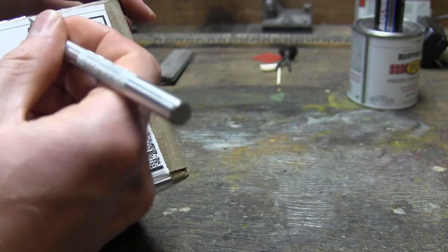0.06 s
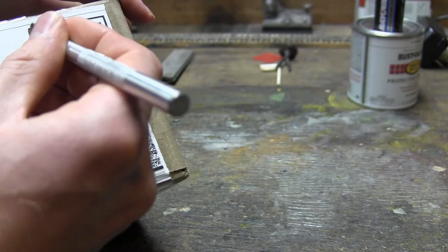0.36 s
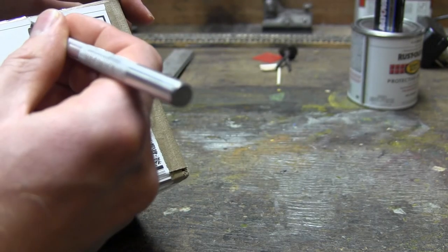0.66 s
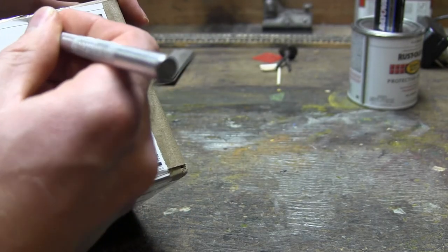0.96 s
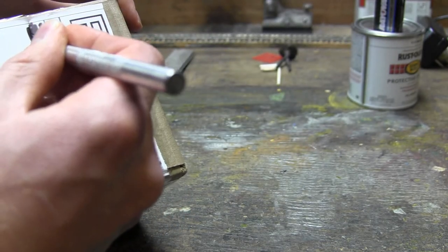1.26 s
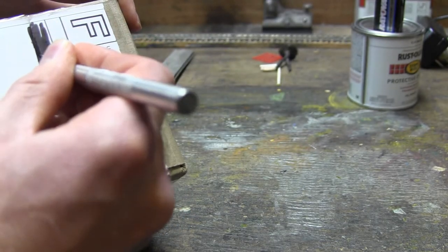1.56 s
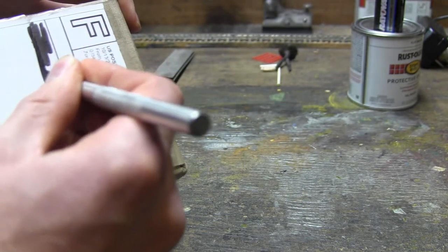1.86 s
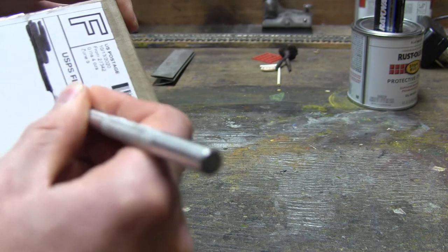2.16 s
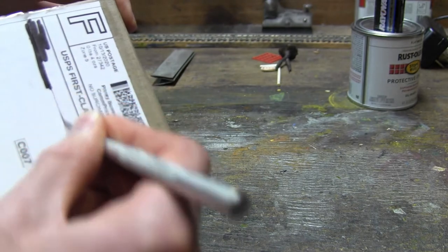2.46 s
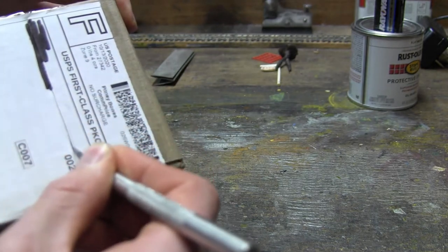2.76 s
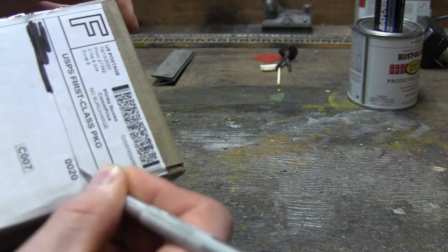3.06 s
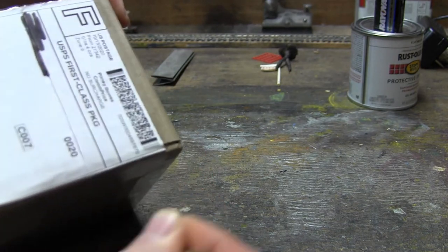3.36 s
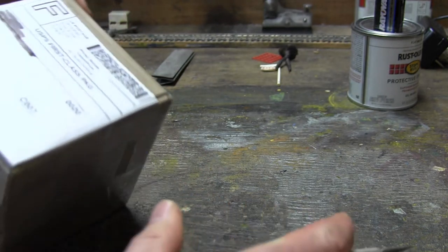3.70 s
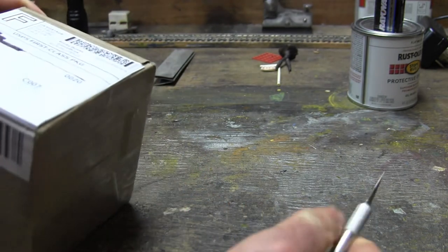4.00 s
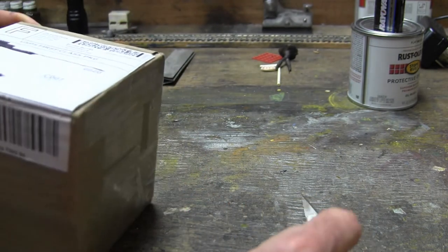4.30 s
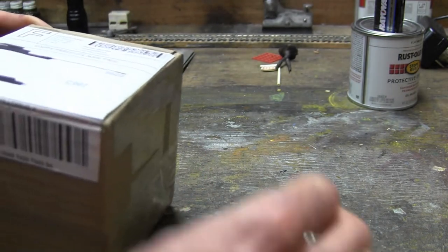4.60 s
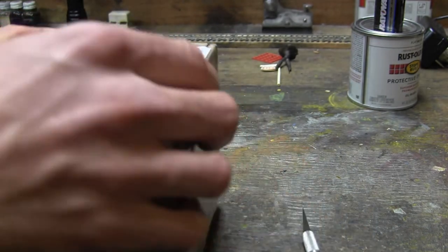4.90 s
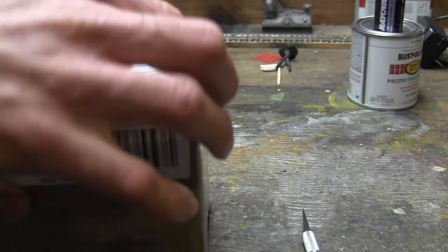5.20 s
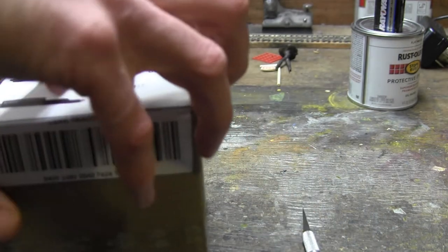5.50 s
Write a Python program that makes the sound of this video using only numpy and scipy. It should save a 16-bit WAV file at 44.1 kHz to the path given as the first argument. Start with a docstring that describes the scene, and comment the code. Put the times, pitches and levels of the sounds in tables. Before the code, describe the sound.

A faint workshop hum fades in, with a few soft finger bumps on a small cardboard box. From about 1 second, a hobby knife saws through the box's tape in short, uneven strokes, close by. Each push rasps and fizzes, and snapping fibres make the box ring hollowly. The cutting is strongest around 2.5 seconds, squeaks faintly near 2.8, and ends in a cluster of sharp snags at about 3.2 seconds. From 3.4 seconds a hand turns the box: dry fingers slide with a soft hiss and the tape ticks as it buckles, most sharply at 4 seconds. The box swishes lightly over the wooden bench while the metal knife is laid down with two knocks, at about 4.3 and 4.5 seconds, the second louder. Finger slides, soft bumps and tape ticks continue until about 5.6 seconds, with another sharp tick near 5.2.

```python
"""At a wooden bench in a faintly humming workshop, a hobby knife saws through the tape of a small
cardboard box in short strokes. Fibres snap under the blade and the box rings with them.
Then a hand turns the box: fingers slide and bump, and the tape ticks as it buckles.
Meanwhile the metal knife is laid on the bench with two knocks."""
import sys
import numpy as np
from scipy import signal
from scipy.io import wavfile

SR = 44100
rng = np.random.default_rng(int(sys.argv[2]) if len(sys.argv) > 2 else 0)


def wav_record(signal):
    """Record a signal, one row per channel, as 16-bit PCM in the file named by sys.argv[1]."""
    frames = np.transpose(np.atleast_2d(signal))
    bounded = np.clip(frames, -1, 1)
    # unit amplitude maps onto the largest positive 16-bit level
    quanta = np.round(bounded * 32767).astype(np.int16)
    wavfile.write(sys.argv[1], SR, quanta)


N = 249165
TIME = np.arange(N) / SR


def amp(db):
    """Turns decibels into a gain. Levels in the tables are relative: each layer adds its own gain."""
    return 10 ** (np.asarray(db) / 20)


def unit(x):
    """Scales a sound to an energy of one."""
    return x / np.sqrt(np.sum(x ** 2) + 1e-20)


def look_up(points, hz):
    """Reads between the rows of a table, on a logarithmic pitch scale."""
    pitches, values = np.transpose(points)
    return np.interp(np.log(hz + 1), np.log(pitches + 1), values)


def add(mix, start_s, sound):
    """Mixes a sound in at a given time."""
    part = mix[max(round(start_s * SR), 0):][:len(sound)]
    part += sound[:len(part)]


def through(x, response):
    """Lets every sample set off a response (convolution), keeping the length."""
    return signal.oaconvolve(x, response)[:len(x)]


def tone_click(tone, size=4096):
    """A sharp click shaped by rows of pitch_hz, level_db. A sound sent through it takes on that tone."""
    hz = abs(np.fft.fftfreq(size, 1 / SR))
    log_gain = np.log(amp(np.maximum(look_up(tone, hz), -100)))
    spectrum = np.exp(np.conj(signal.hilbert(log_gain)))  # packs the energy at the start
    return unit(np.fft.ifft(spectrum).real[:size // 2])


def band(x, low_hz, high_hz, order=3):
    """Keeps the sound between two pitches."""
    edges = [low_hz, min(high_hz, SR / 2 - 1)]
    return signal.sosfilt(signal.butter(order, edges, "band", fs=SR, output="sos"), x)


def ring(notes, stretch=1, vary_db=0, size=16384):
    """A struck object's notes, swinging in alternate directions; each drops 60 dB in ring_s * stretch."""
    t = TIME[:size]
    spot_db = vary_db * rng.uniform(-1, 1, len(notes))  # the spot struck favours some notes
    return sum((-1) ** k * amp(db + spot_db[k] - 60 * t / (ring_s * stretch))
               * np.sin(2 * np.pi * hz * t) for k, (hz, db, ring_s) in enumerate(notes))


def echoes(fades, size=16384):
    """Dense random echoes from rows of pitch_hz, fade_s: each pitch drops 60 dB in its own time."""
    hz, t, spectrum = signal.stft(rng.choice([-1., 1.], size), SR, nperseg=128)
    decay = amp(-60 * t / look_up(fades, hz)[:, None])
    return unit(signal.istft(spectrum * decay, SR)[1][:size])


def friction(per_s, spread_db, clump_db, clump_hz, smooth):
    """Rubbing: tiny slips of uneven size, in clumps, over a smooth hiss."""
    slips = (rng.random(N) < per_s / SR) * rng.choice([-1, 1], N)
    sizes = amp(spread_db * np.minimum(rng.exponential(1, N), 3.5))
    clumps = np.interp(TIME * clump_hz, np.arange(N), np.clip(rng.standard_normal(N), -2, 2))
    hiss = smooth * unit(rng.standard_normal(N))
    return np.sqrt(N) * unit((unit(slips * sizes) + hiss) * amp(clump_db * clumps))


def swell(middle_s, length_s, edge_db):
    """Loudness of a slide that speeds up and slows down, passing edge_db at either end."""
    return amp(np.maximum(edge_db * (2 * (TIME - middle_s) / length_s) ** 2, -200))


# tone of the workshop air: pitch_hz, level_db
AIR_TONE = [(20, -20), (60, -17.5), (100, -11.5), (180, -6), (330, -10.5), (600, -9.5), (1200, -15),
            (3000, -19.5), (8000, -25), (16000, -30)]
# notes in the electric hum: multiple_of_mains_hz, level_db
HUM_NOTES = [(1, -67), (2, -62), (3, -67.5), (4, -69.5), (5, -68.5), (7, -71), (12, -70.5), (14, -73)]
def workshop(air_db=-60, mains_hz=120):
    """Mains electricity hums over a soft rush of air."""
    left, right, shared = (through(rng.standard_normal(N), tone_click(AIR_TONE)) for _ in range(3))
    hum = sum(np.sqrt(2) * amp(db) * np.sin(2 * np.pi * (multiple * mains_hz * TIME + rng.random()))
              for multiple, db in HUM_NOTES)
    return amp(air_db) * (shared + 0.99 * np.array([left, right])) + hum


# how long the room echoes: pitch_hz, fade_s
ROOM_FADES = [(150, 0.63), (500, 0.14), (1500, 0.19), (5000, 0.24), (14000, 0.066)]
def in_room(x, treble_left_db, room_db, bass_left_db=-8):
    """Makes stereo: treble and bass each lean to a side, and nearby things and the room echo."""
    shared = echoes(ROOM_FADES)
    delay = round(.003 * SR)
    tails = [np.pad(unit(shared + 0.35 * echoes(ROOM_FADES)), (delay, 0)) for _ in range(2)]
    treble = signal.sosfilt(signal.butter(1, 7000, "high", fs=SR, output="sos"), x)
    bass = signal.sosfilt(signal.butter(1, 170, fs=SR, output="sos"), x)
    nearby = unit(rng.standard_normal(1024) * amp(-60 * TIME[:1024] / 0.011))  # things on the bench
    lean = (amp(treble_left_db / 2) - 1) * treble + (amp(bass_left_db / 2) - 1) * bass
    lean += amp(-12) * through(treble, nearby)
    return np.array([x + side * lean + amp(room_db) * through(x, tail)
                     for side, tail in zip((1, -1), tails)])


# tone of cardboard sliding on wood: pitch_hz, level_db
SWISH_TONE = [(1000, -40), (3400, -22), (4250, -17), (4800, -4), (6200, -1), (6950, 4), (8000, -6),
              (10500, -6), (16000, -15)]
def box_turning():
    """The underside of the box swishes over the bench."""
    slide = friction(per_s=5400, spread_db=-5, clump_db=3, clump_hz=113, smooth=2.2)
    speed = swell(middle_s=4.286, length_s=.56, edge_db=-15)
    return amp(-45) * through(slide * speed, tone_click(SWISH_TONE))


# tone of sliding skin: pitch_hz, level_db
SKIN_TONE = [(1060, -24), (1800, -10), (2630, -11), (3680, 1), (4170, -6.5), (5090, 2.5), (5720, 1.5),
             (8590, 3), (9410, 0.5), (11000, 3.5), (14400, -2), (15600, -3)]
# tone of the rubbed box walls: pitch_hz, level_db
WALL_TONE = [(88, -52), (150, -35), (185, 0.5), (206, -28), (232, -22), (264, -9), (448, -0.5), (2090, -13),
             (3500, -13.5), (4550, -27.5), (7700, -120)]
# finger slides: middle_s, length_s, skin_db, wall_db
SLIDES = [(3.401, 0.041, -48.5, -58), (3.665, 0.18, -45, -52.5), (3.796, 0.066, -50, -69),
          (3.998, 0.088, -43, -66), (4.203, 0.32, -45, -60), (4.366, 0.14, -42, -51),
          (4.694, .24, -45, -50.5), (4.856, 0.3, -45, -48.5), (4.956, 0.11, -40, -47),
          (5.087, 0.16, -46, -54.5), (5.254, 0.063, -51, -54), (5.364, 0.12, -46, -47),
          (5.596, 0.19, -48, -49)]
def finger_slides():
    """Dry skin slides over card and tape: a fine hiss, and a murmur from the walls."""
    grip = np.clip((TIME - 3.28) / .15, 0, 1)  # the hand takes hold and keeps shifting between slides
    skin_gain, wall_gain = amp(-55.5) * grip, amp(-57) * grip
    for middle_s, length_s, skin_db, wall_db in SLIDES:
        speed = swell(middle_s, length_s, edge_db=-13)
        skin_gain = np.hypot(skin_gain, amp(skin_db - 1) * speed)
        wall_gain = np.hypot(wall_gain, amp(wall_db) * speed)
    skin = friction(per_s=6000, spread_db=2, clump_db=3, clump_hz=156.8, smooth=1.9)
    drag = friction(per_s=900, spread_db=4, clump_db=-2.5, clump_hz=69.5, smooth=1)
    hiss = through(skin * skin_gain, tone_click(SKIN_TONE))
    murmur = through(drag * wall_gain, tone_click(WALL_TONE))
    return hiss + murmur


# fingertips landing: start_s, level_db, pitch_hz
FINGER_BUMPS = [(.146, -26.5, 610), (.22, -22, 860), (.308, -31.5, 765), (.621, -32.5, 710),
                (3.69, -25, 480), (3.733, -29.5, 540), (4.640, -23, 445), (4.821, -23, 1130),
                (4.929, -28.5, 930), (5.195, -24.5, 1280), (5.335, -27, 407), (5.548, -26, 1130)]
def finger_bumps(decay_s=0.0032, size=4096):
    """A fingertip lands on a wall of the box, which answers with a short hollow note."""
    out = np.zeros(N)
    for start_s, db, hz in FINGER_BUMPS:
        wobble = rng.standard_normal(size) * np.exp(-TIME[:size] / decay_s)
        add(out, start_s, amp(db + 7) * unit(band(wobble, hz * 0.69, hz * 1.28, order=2)))
    return out


# ticks of the tape: start_s, peak_db, low_edge_hz
TAPE_TICKS = [(0.61, -32, 4000), (.633, -29, 4000), (1.033, -28.5, 7000), (1.111, -34.5, 5000),
              (2.5577, -14.5, 2800), (3.023, -33, 4000), (3.4887, -21, 3560), (3.799, -24.5, 5000),
              (3.9488, -24, 6000), (3.9602, -10.5, 6100), (3.9714, -21, 6000), (4.0493, -3, 6660),
              (4.184, -22.5, 5000), (4.383, -21, 5500), (4.695, -18, 5530), (4.762, -21, 6000),
              (4.929, -16, 5070), (5.0068, -23, 7000), (5.144, -24.5, 3000), (5.195, -7.5, 3300),
              (5.515, -22.5, 3900), (5.547, -19, 5530)]
def tape_ticks(top_hz=12900, crumple_s=0.001, size=1024):
    """Stiff tape buckles: a quick snap with a tiny crumple after it."""
    out = np.zeros(N)
    for start_s, db, low_hz in TAPE_TICKS:
        buckle = amp(-8) * unit(rng.standard_normal(size) * np.exp(-TIME[:size] / crumple_s))
        buckle[0] += 1  # the snap
        tone = [(low_hz * 0.14, -30), (low_hz * 0.51, -16), (low_hz, 0),
                (top_hz, 0), (top_hz * 1.66, -20)]
        tick = through(buckle, tone_click(tone))
        add(out, start_s, amp(db) * tick / abs(tick).max())
    return out


# notes of the bench top: pitch_hz, level_db, ring_s
BENCH_NOTES = [(172, -32, .22), (280, -28, .1), (458, -19, .13), (511, -15, .13), (565, -18, .17),
               (795, -14, .08), (960, -6, .085), (1035, -11, .07), (1275, -10, .05), (1350, 0, .062),
               (1453, -17, .08), (1722, -5, .06), (1803, -14, .08), (2022, -12, .09), (2309, -17, .08),
               (2417, -17, .07), (2672, -16, .08), (3747, -23, .07), (4900, -24, .06), (5399, -25, .08)]
# notes of the metal handle: pitch_hz, level_db, ring_s
HANDLE_NOTES = [(9350, -16, .022), (9500, -16, .028), (9850, -17, .02), (14200, -30, .02)]
# tone of metal hitting wood: pitch_hz, level_db
KNOCK_TONE = [(60, -38), (160, -15), (280, -11), (380, -12), (520, -4), (950, 0), (1400, 0), (2000, -4),
              (3200, -13), (5200, -16), (8500, -28), (14000, -43)]
# how long the bench clatters: pitch_hz, fade_s
CLATTER_FADES = [(150, .19), (500, .13), (1300, .078), (3000, .075), (8000, .05)]
# the knife meets the bench: start_s, level_db, ring_stretch, ping_db
LANDINGS = [(4.2855, -17, .65, -20), (4.2884, -13.5, .65, -30), (4.4655, -8.5, .9, -2),
            (4.4685, -8, 1, -12)]
def knife_knocks():
    """Each end of the handle lands and bounces: a crack, ringing and clattering wood, a brief ping."""
    out, crack = np.zeros(N), tone_click(KNOCK_TONE)
    for start_s, db, stretch, ping_db in LANDINGS:
        fades = [(hz, fade_s * np.sqrt(stretch)) for hz, fade_s in CLATTER_FADES]
        clatter = amp(17) * unit(through(echoes(fades), crack))
        wood = amp(-7.5) * ring(BENCH_NOTES, stretch)
        ping = amp(ping_db) * ring(HANDLE_NOTES, stretch)
        add(out, start_s, amp(db) * (wood + ping + clatter))
        add(out, start_s, amp(db + 9) * crack)
    return band(out, 120, 16000, order=2)


# low notes of the rocking box: pitch_hz, level_db, ring_s
DRUM_NOTES = [(68.4, -2, 0.21), (143, 2, 0.49)]
def box_rocking(start_s=3.19):
    """Freed by the last cut, the box rocks and drums."""
    out = np.zeros(N)
    add(out, start_s, amp(-42) * ring(DRUM_NOTES))
    return out


# tone of the box under the blade: pitch_hz, level_db
CUT_TONE = [(40, -36), (100, -35), (150, -10), (320, -8), (430, -1), (810, -1.5), (1000, -10),
            (2050, -11.5), (3380, -17), (4240, -25.5), (4930, -16.5), (8000, -18), (11200, -13.5),
            (16000, -25)]
# notes of the box walls and the air inside: pitch_hz, level_db, ring_s
BOX_NOTES = [(213, -21, 0.08), (357, -26, 0.11), (445, -8.5, 0.068), (480, -17.5, 0.2), (584, 7.5, 0.015),
             (664.3, -9, 0.15), (787, -13.5, 0.073), (848, -8.5, 0.12), (1200, -26, 0.069),
             (1380, -6.5, 0.022), (2325, -19, 0.016)]
def box_answer(size=6144):
    """What a snapping fibre sets off at one spot: the box booms, the card rasps, the tape fizzes."""
    flutter = amp(-5) * echoes([(100, 0.072), (10000, 0.036)], size)  # waves run about in the walls
    flutter[0] += 1  # the snap itself
    wall = through(flutter, tone_click(CUT_TONE))
    notes = band(ring(BOX_NOTES, vary_db=3, size=size), 150, 5000, order=2)
    boom = unit(unit(band(wall, 22, 1170)) + amp(-3) * unit(notes))
    rasp = unit(band(wall, 1197, 3900))
    fizz = unit(band(wall, 4530, SR / 2))
    return boom, rasp, fizz


# squeaks deep in the card: loudest_s, pitch_hz, glide_hz_per_s, level_db
SQUEAKS = [(2.734, 1980, 8000, -32), (2.84, 2080, 980, -30)]
def blade_chatter(width_hz=520, reach_s=.12, rise_db_per_s=380, fall_db_per_s=332):
    """Uneven slips of the blade make the slit card ring with one rough, rising note."""
    out = np.zeros(N)
    slips = friction(per_s=900, spread_db=3, clump_db=-1.5, clump_hz=199.3, smooth=0.55)
    narrow = signal.butter(2, width_hz / 2, fs=SR, output="sos")
    for loudest_s, hz, glide, db in SQUEAKS:
        during = abs(TIME - loudest_s) < reach_s
        t = TIME[during] - loudest_s
        note = np.exp(2j * np.pi * np.cumsum(hz + glide * t) / SR)
        squeak = (note * signal.sosfilt(narrow, slips[during] / note)).real  # keeps pitches near the note
        gain = amp(db + np.minimum(rise_db_per_s * t, -fall_db_per_s * t))
        out[during] += np.sqrt(len(t)) * unit(squeak) * gain
    return out


# the blade catches and breaks free: start_s, level_db, fizz_db
SNAGS = [(.949, -26.5, -11), (.969, -21.5, -8.5), (.990, -14, -14.5), (1.209, -10, -5.5), (1.212, -11, -9),
         (1.255, -13, -12), (1.430, -15, -14), (1.499, -14.5, 1.5), (1.689, -18.5, -9), (1.716, -16, -8),
         (1.813, -14.5, -4.5), (2.038, -14, -4), (2.089, -7.5, -15.5), (2.097, -11, -1), (2.132, -13.5, 2),
         (2.271, -8, -6.5), (2.283, -16.5, 0.5), (2.402, -25, -11), (2.451, -10.5, 2), (2.473, -3, -15),
         (2.624, -16.5, -5), (2.690, -14, -3.5), (2.723, -10.5, -4), (2.824, -14, -7), (2.836, -16, -3.5),
         (3.092, -20.5, -3.5), (3.125, -5, -7), (3.149, -9, -9), (3.175, -2, -0.5), (3.188, -8, 5.5),
         (3.219, -6.5, 0)]
def blade_snags(burst_s=0.0017, size=1024):
    """Each snag is a short burst of tearing that jolts the box."""
    out, spots = np.zeros(N), [box_answer() for _ in range(6)]
    for k, (start_s, db, fizz_db) in enumerate(SNAGS):
        burst = rng.standard_normal(size) * np.exp(-TIME[:size] / burst_s)
        boom, rasp, fizz = (unit(through(part, burst)) for part in spots[k % len(spots)])
        jolt = boom + amp(fizz_db / 2 - 5) * rasp + amp(fizz_db - 1) * fizz
        add(out, start_s, amp(db + 7) * jolt)
    return out


# pushes of the blade: bite_s, hold_s, rise_s, fall_s, level_db, swell_db, rasp_db, fizz_db
PUSHES = [(1.207, 0.067, 0.012, 0.047, -34, -4, -5.5, -3.5), (1.348, 0.049, 0.024, .05, -42.5, 5, -8, -8.5),
          (1.438, 0.057, 0.042, 0.056, -28.5, 1.5, -4.5, -2.5),
          (1.712, 0.031, 0.075, 0.093, -31.5, -1, -8, -7.5),
          (1.795, 0.045, 0.072, 0.047, -31, 3.5, -8.5, -6.5),
          (2.062, 0.089, 0.097, 0.05, -27, 1.5, -8.5, -6), (2.237, 0.04, .045, 0.052, -35, 7, -8, -5.5),
          (2.451, 0.052, 0.032, .055, -22, 3.5, -6.5, -1.5),
          (2.623, .052, 0.021, 0.068, -34.5, -3, -5.5, -6), (2.685, 0.061, 0.033, 0.067, -31, 4, -3.5, -3),
          (2.824, 0.033, .03, .12, -27.5, 0, -9.5, -4.5), (3.122, 0.088, 0.055, 0.059, -30, 3.5, -2.5, -1)]
def blade_strokes(drop_db=32):
    """Each push builds up, holds and lets go, tearing a stream of fibres at a new spot on the box."""
    out = np.zeros(N)
    fibres = friction(per_s=3000, spread_db=2.5, clump_db=3.5, clump_hz=261.6, smooth=0.58)
    for bite_s, hold_s, rise_s, fall_s, db, swell_db, rasp_db, fizz_db in PUSHES:
        during = (TIME >= bite_s - 2 * rise_s) & (TIME < bite_s + hold_s + 2 * fall_s)
        t = TIME[during] - bite_s
        slack = np.maximum(-t / rise_s, 0) + np.maximum((t - hold_s) / fall_s, 0)  # zero in the hold
        progress = np.clip(t / hold_s, 0, 1)
        force = amp(db + swell_db * (progress - .5) - drop_db * slack)
        boom, rasp, fizz = box_answer()
        box = amp(-1.5) * boom + amp(rasp_db - 2) * rasp + amp(fizz_db - 3) * fizz
        add(out, TIME[during][0], signal.fftconvolve(fibres[during] * force, box))
    return out


def scene():
    """Cutting, handling and the knife's knocks, over the workshop's hum."""
    cutting = blade_strokes() + blade_chatter() + blade_snags() + box_rocking()
    mix = in_room(cutting, treble_left_db=3, room_db=-16)
    handling = finger_slides() + box_turning() + finger_bumps()
    mix += in_room(handling, treble_left_db=1.5, room_db=-13)
    mix += in_room(tape_ticks(), treble_left_db=1.5, room_db=-15)
    mix += in_room(knife_knocks(), treble_left_db=-6, room_db=-11.5)
    return mix + workshop()


# the opening fade: time_s, level_db
OPENING_FADE = [(0, -45), (.04, -26), (.1, -17), (.2, -10), (.35, -5), (.6, 0)]
def record(dry):
    """The sound fades in, its tallest peaks are rounded off and the highest treble is cut."""
    faded = dry * amp(np.interp(TIME, *np.transpose(OPENING_FADE)))
    rounded = faded / (1 + (faded / .85) ** 4) ** .25
    treble_cut = signal.firwin(255, cutoff=15900, window=("kaiser", 9), fs=SR)
    return signal.oaconvolve(rounded, treble_cut[None], "same")


dry = scene()
out = record(dry)
wav_record(out)
```